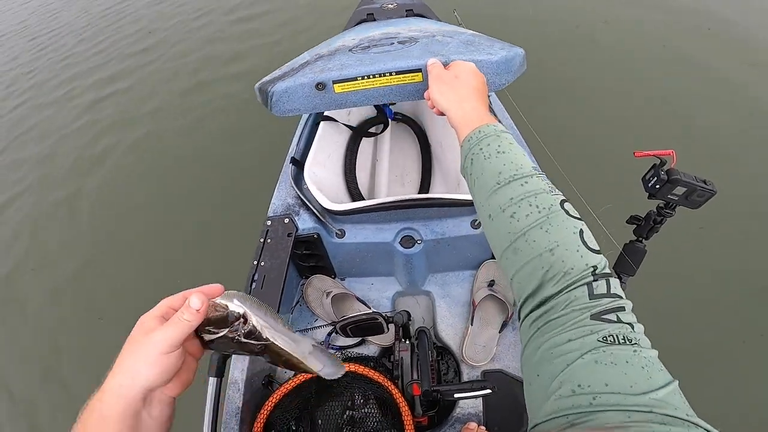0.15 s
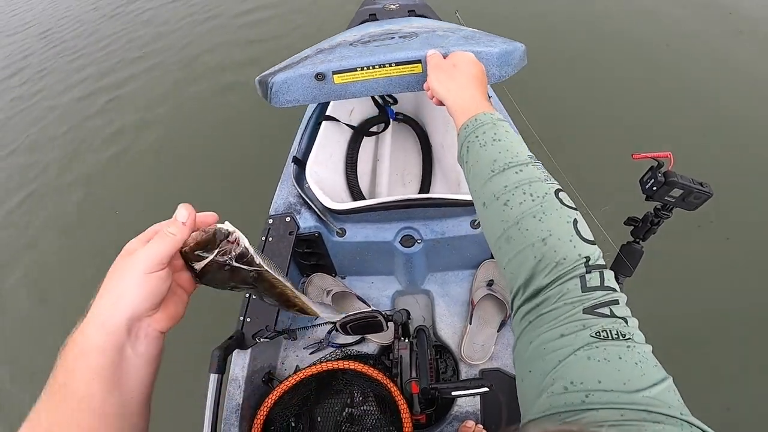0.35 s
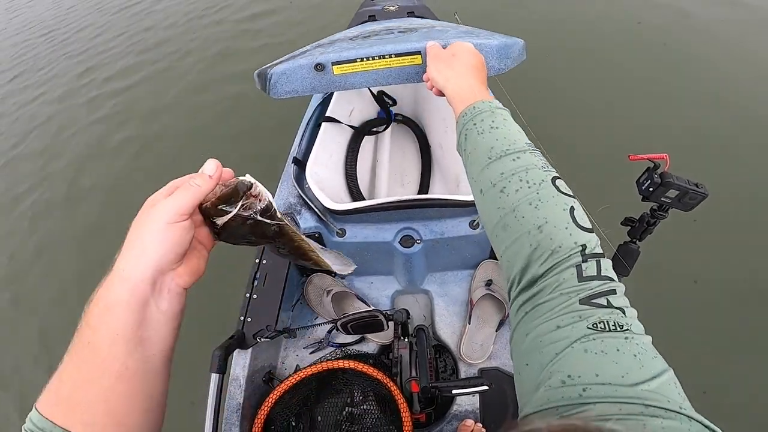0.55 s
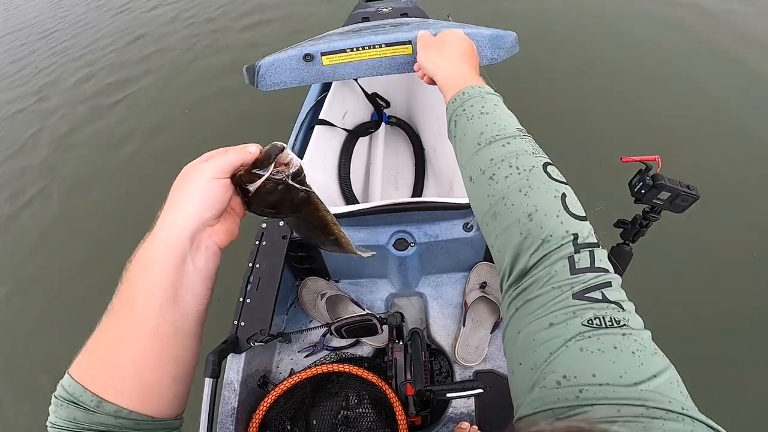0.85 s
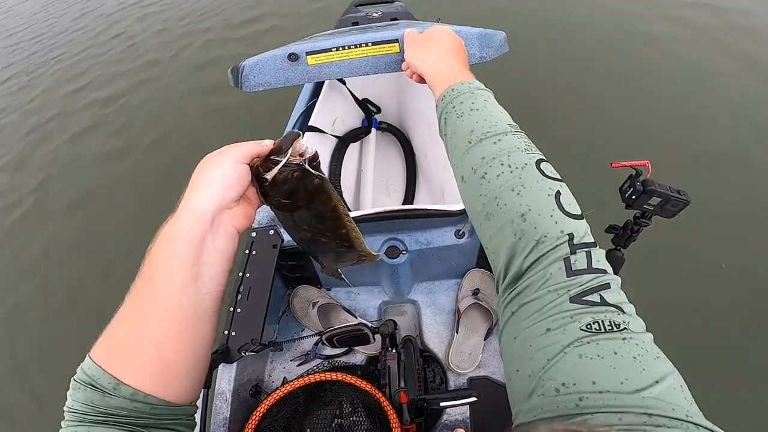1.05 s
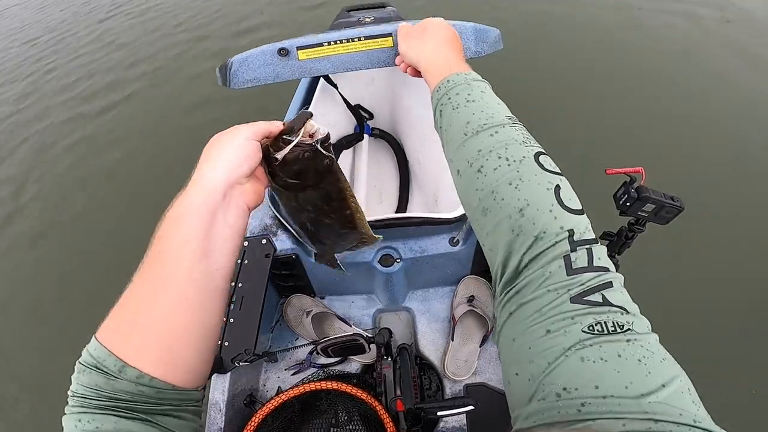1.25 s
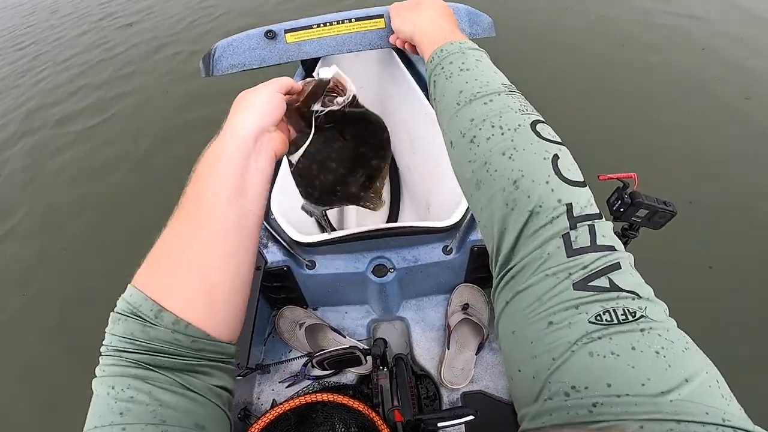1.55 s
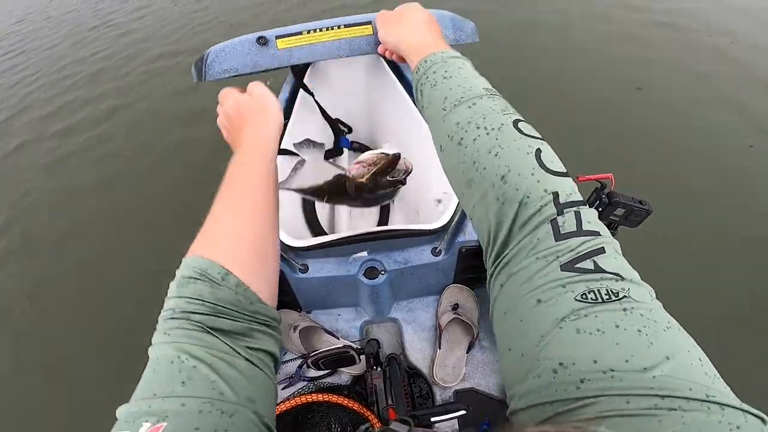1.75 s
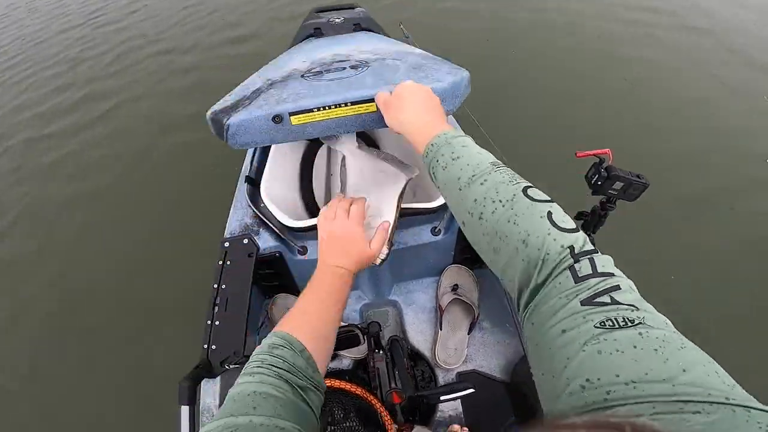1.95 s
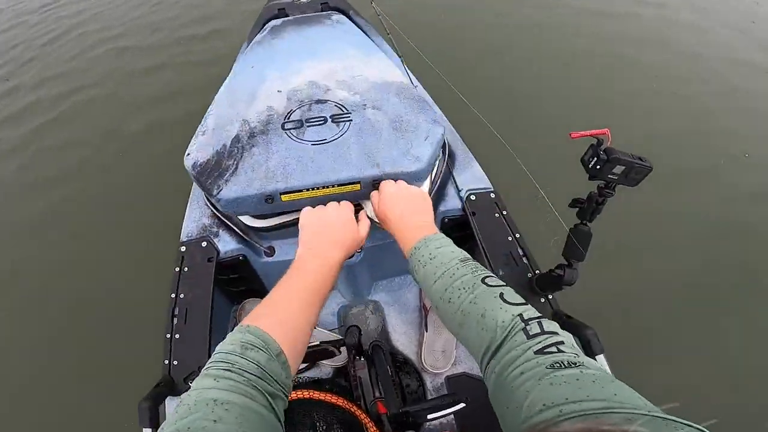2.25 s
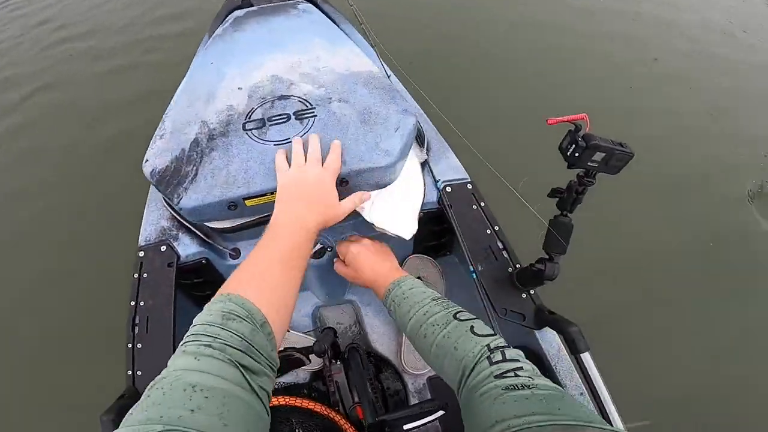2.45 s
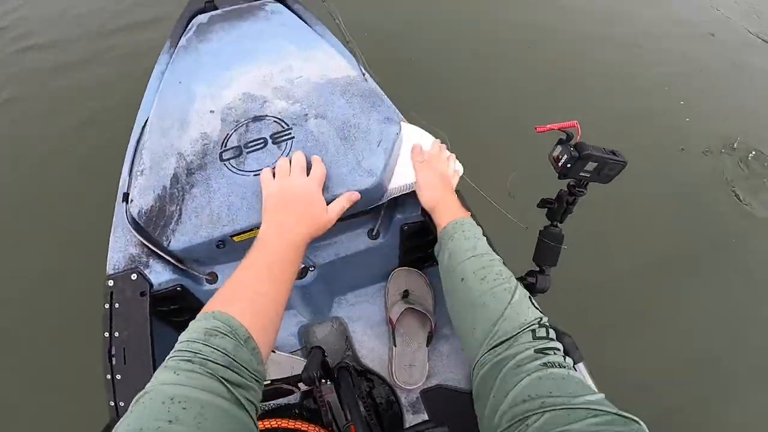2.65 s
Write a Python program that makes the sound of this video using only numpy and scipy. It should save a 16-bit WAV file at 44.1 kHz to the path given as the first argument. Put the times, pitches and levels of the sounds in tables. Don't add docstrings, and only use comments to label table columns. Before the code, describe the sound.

Close camera microphone on open water: steady low hull rumble with faint ripples and drops, then a fish thrashing in a hollow plastic hatch, smacking, scraping and thumping as the lid is forced shut with a bang.

```python
import sys
import numpy as np
from scipy import signal
from scipy.fft import rfft, irfft, next_fast_len
from scipy.io import wavfile
from scipy.ndimage import map_coordinates

SR = 44100
rng = np.random.default_rng(int(sys.argv[2]) if len(sys.argv) > 2 else 0)


def pcm_store(signal):
    levels = np.round(np.clip(np.atleast_2d(signal), -1, 1) * 32767)
    wavfile.write(sys.argv[1], SR, levels.astype(np.int16).T)


def gain_from_db(level_db):
    decades = np.asarray(level_db, float) / 20
    return 10 ** decades


N = 123479

# frequency in Hz, strength in dB per Hz.
RUMBLE_COLOUR = [(8.8, -56.5), (15, 2), (43, -5.5), (130, -3), (152, -8), (334, -20), (600, -39.5),
                 (780, -79.5), (1320, -120)]
# centre in Hz, width in Hz, boost over the rumble in dB.
HULL_PEAKS = [(46.4, 25, 1), (87, 42, 6.5), (132, 4.4, 7.5), (309, 19, 3.5)]
# frequency in Hz, strength in dB per Hz.
HISS_COLOUR = [(290, -30), (500, -7), (675, -3.5), (1470, -5), (6140, -23), (8640, -25), (12300, -48),
               (13000, -66.5)]
# frequency in Hz, likeness (1 is the same).
LIKENESS = [(30, 0.63), (80, 0.95), (200, 1), (1000, 0.92), (3000, 0.28), (8000, 1)]
# start in seconds, peak level in dB, centre in Hz.
DROPS = [(0.112, -51, 5260), (0.3644, -61, 3150), (0.432, -60, 2300), (0.54, -65, 6000),
         (0.716, -59.5, 4500), (0.7528, -62, 2610), (0.761, -59, 3000), (0.774, -60.5, 2400),
         (0.9695, -66, 2300), (1.0253, -53, 3030), (1.2133, -56.5, 2360), (1.3554, -57.5, 2290),
         (1.394, -54.5, 2270), (1.4703, -53, 2770)]
# start in seconds, peak level in dB, pitch the spot favours in Hz, contact time in ms.
TUB_KNOCKS = [(1.578, -39, 1210, 1.9), (1.658, -31, 1230, 1.7), (1.711, -22, 1170, 1.7),
              (1.7205, -8, 1220, 0.76), (1.7255, -4.5, 670, 0.13), (1.7313, -4.5, 704, .2),
              (1.736, -21, 920, 12), (1.747, -16, 1110, 1.7), (1.754, -24, 1200, 7.8),
              (1.779, -19.5, 1150, 2), (1.806, -20.5, 1120, 2.1), (1.815, -17, 1100, 2.6),
              (1.844, -24.5, 1230, 1.6), (1.907, -31.5, 900, 1.2), (1.950, -16.5, 785, 1),
              (1.956, -15, 790, 5), (2.012, -18.5, 770, 9), (2.003, -23.5, 394, 4.9),
              (2.028, -20, 500, 9.1), (2.072, -32, 423, 4), (2.112, -21.5, 497, 7), (2.088, -59, 1000, 4),
              (2.096, -17.5, 660, 3.7), (2.105, -20, 660, 3)]
LID_KNOCKS = [(2.219, -26, 500, 6), (2.2245, -16.5, 1520, 0.99), (2.228, -8, 626, 1.7),
              (2.232, -16, 460, 1), (2.238, -15, 617, 1.6), (2.271, -19.5, 960, 3.1),
              (2.275, -19, 340, 2.5), (2.288, -23, 1010, 4.6), (2.319, -17, 1500, 0.36),
              (2.343, -19, 1060, 2.8), (2.375, -34, 1350, 2.4), (2.406, -11, 1390, 8),
              (2.413, -14.5, 726, 4), (2.427, -12.5, 860, 4.5), (2.437, -16.5, 867, 4.7),
              (2.461, -12, 1370, 7.5), (2.466, -12.5, 340, 3.3), (2.478, -8.5, 630, 5.5),
              (2.495, -12, 780, 3.6), (2.519, -7.5, 635, .8), (2.527, -18.5, 628, 6.1),
              (2.545, -15, 700, 5.7), (2.560, -10.5, 560, 3.9), (2.576, -17.5, 830, 4.6),
              (2.581, -26, 345, 1.4), (2.646, -19, 496, 15), (2.655, -13.5, 363, 9.8)]
RIM_KNOCKS = [
    (2.7237, -3.5, 1450, 0.52),
    (2.7374, -18, 1300, 5.2),
    (2.7756, -9.5, 1520, 2),
    (2.7854, -15.5, 1540, 7.3),
]
# centre in Hz, width in Hz, level in dB.
TUB_MODES = [(397, 74, 13), (647, 70, -2.5), (790, 38, -4), (1099, 90, 7.5), (1300, 77, 6), (1570, 170, 5)]
LID_MODES = [(345, 30, -1), (500, 50, -8), (635, 14, 10), (856, 30, 1), (1049, 60, -4), (1300, 80, -6),
             (1534, 80, -5)]
RIM_MODES = [(540, 60, 12), (1040, 60, 20), (1490, 70, 33), (2100, 1140, 17)]
# time in seconds, level in dB.
SCRAPE_LEVEL = [(1.581, -68.5), (1.70, -51), (1.816, -46.5), (1.888, -56.5), (1.964, -41), (2.112, -45.5),
                (2.151, -55.5), (2.212, -45), (2.286, -39.5), (2.387, -42.5), (2.479, -35.5),
                (2.642, -36.5), (2.702, -43.5), (2.778, -33.5)]
# frequency in Hz, strength in dB per Hz.
RUB_COLOUR = [(100, -15), (200, 5.5), (700, -10), (1600, -14.5), (3500, -23.5), (15800, -51.5)]
# start in seconds, peak level in dB, centre in Hz, spray after the crack in dB.
TUB_SMACKS = [(1.6134, -39.5, 1990, 5.5), (1.6287, -34, 2070, -3), (1.6472, -31, 1480, -6),
              (1.6589, -29.5, 3320, -9.5), (1.709, -23.5, 1930, -19), (1.725, -11, 1770, -2.5),
              (1.7311, -24.5, 2100, -6), (1.746, -47.5, 2260, -17), (1.7514, -34, 1910, -8),
              (1.769, -30.5, 2400, 2), (1.8033, -23, 3050, -8), (1.8204, -31.5, 1960, -10),
              (1.8448, -28.5, 2320, -7), (1.95, -25, 2330, 7), (1.907, -40, 2030, -10),
              (1.9989, -6.5, 2330, -5), (2.0627, -39, 1890, 6), (2.0923, -21, 2840, 19),
              (2.1066, -18, 2940, -13)]
LID_SMACKS = [(2.2215, -23.5, 2050, -25), (2.2737, -17.5, 2520, -10), (2.279, -20, 3480, -11),
              (2.2886, -19, 4040, -6), (2.2973, -22.5, 4700, 13), (2.319, -21.5, 2530, -30),
              (2.346, -48, 3100, -21), (2.3527, -17.5, 2200, -14), (2.3757, -15, 2260, -11.5),
              (2.41, -25, 2500, -6), (2.4932, -48, 3300, -18), (2.5516, -18, 3060, -26),
              (2.591, -11, 3350, -31), (2.6364, -27.5, 1970, -31), (2.646, -17, 3080, -23),
              (2.6551, -20, 2880, -25), (2.6648, -19, 2730, -44), (2.7255, -4.5, 2900, -29),
              (2.7577, -27, 1870, -11), (2.7752, -14.5, 2100, -6.5), (2.7848, -19.5, 4350, -12.5)]
# frequency in Hz, strength in dB per Hz.
SKIN_COLOUR = [(530, -57), (900, 1.5), (4130, -4), (4690, -9), (9020, -18), (13900, -29), (15700, -58)]
# start in seconds, peak level in dB, pitch in Hz.
BOOMS = [(1.729, -9, 183), (1.7404, -11, 187.5), (1.75, -9, 186), (1.764, -15.5, 161), (1.783, -14.5, 158),
         (1.944, -14, 132.5), (2.026, -11.5, 79), (2.165, -14, 113), (2.227, -9, 92), (2.236, -8.5, 208),
         (2.27, -11.5, 157), (2.293, -10.5, 80.5), (2.401, -8, 87), (2.419, -7, 132.3), (2.461, -3, 144),
         (2.494, -3.5, 75.3), (2.518, -3, 107), (2.558, -9, 165.5), (2.594, -11, 183), (2.649, -5, 132),
         (2.726, -0.5, 141), (2.75, -21, 161)]
# start in seconds, peak level in dB.
HEAVES = [
    (1.74, -16.5),
    (1.992, -18),
    (2.227, -19),
    (2.411, -19.5),
    (2.486, -17),
    (2.553, -15.5),
    (2.726, -20.5),
]
# frequency in Hz, level in dB.
MIC_ROLLOFF = [(9000, 0), (13800, -5), (15800, -13)]

RUMBLE_DB, HISS_DB = -30.5, -59
RIPPLE_CLICK_DB, RIPPLE_SPREAD_DB = -5.5, 3.5
DROP_DB, DROP_SPRAY_DB, DROP_BROAD_DB = 8.5, -27, -8.5
KNOCK_DB, STRIKE_SCATTER_DB = -3, 2.2
SPOT_DB = 14.5
FIRST_TOUCH = 1.4
SCRAPE_DB, GRAINS_PER_S, GRAIN_DB, GRAIN_SPREAD_DB = 1, 500, -0.5, 7.6
GRAIN_HZ, GRAIN_CYCLES = 2440, 4.3
SMACK_DB, SMACK_BROAD_DB = -1, -1
SMACK_WIDTH = 0.18
CRACK_T60, SPRAY_T60 = 0.015, 0.088
SOFT_TILT = 0.031
BOOM_DB, BOOM_T60, BOOM_RISE_S = -5, 0.15, 0.0018
HEAVE_DB, HEAVE_HZ, HEAVE_T60, HEAVE_RISE_S = -2, 53.4, 0.54, 0.0062
ECHO_DB, ECHO_T60 = -14, 0.044
LAG_S, LAG_ENDS_HZ = 2 / 44100, 10900
SHADE_DB = -5
TOP_HZ = 15800


def unit(x):
    return x / np.sqrt(np.mean(x ** 2) + 1e-20)


def along(points, hz):
    f, v = np.transpose(points)
    return np.interp(np.log(hz + 1), np.log(f + 1), v)


def wobble(rate):
    knots = rng.standard_normal(int(N * rate / SR) + 4)
    return map_coordinates(knots, [np.arange(N) * rate / SR])


def filtered(x, response):
    n = x.shape[-1]
    m = next_fast_len(2 * n)
    return irfft(rfft(x, m) * response(np.fft.rfftfreq(m, 1 / SR)), m)[..., :n]


def panels(modes):
    def response(f):
        total = 0
        for k, (centre, width, db) in enumerate(modes):
            damping = 1j * f * width
            total = total + (-1) ** k * gain_from_db(db) * damping / (centre * centre - f * f + damping)
        return total
    return response


def rush(gain):
    def mid_and_side(f):
        turn = np.arccos(np.clip(along(LIKENESS, f), -1, 1)) / 2
        return gain(f) * np.array([np.cos(turn), np.sin(turn)])

    mid, side = filtered(rng.standard_normal((2, N)), mid_and_side)
    return unit(np.array([mid + side, mid - side]))


def add(track, s, sound, db):
    i = round(s * SR)
    scaled = gain_from_db(db) * sound / np.abs(sound).max()
    track[..., i:i + sound.shape[-1]] += scaled[..., :max(N - i, 0)]


def clicks(per_s, spread_db):
    count = int(per_s * N / SR)
    when = (rng.random(count) * N).astype(int)
    pitch, size = rng.standard_normal((2, count, 1))
    hz = np.clip(GRAIN_HZ * np.exp(0.65 * pitch), 300, 14000)
    k = np.arange(SR // 100)
    fade = np.exp(-k / SR * hz / GRAIN_CYCLES)
    rings = gain_from_db(spread_db * size) * np.sqrt(GRAIN_HZ / hz) * np.sin(2 * np.pi * hz * k / SR) * fade
    return unit(np.bincount((when[:, None] + k).ravel(), rings.ravel(), N)[:N])


def rumble():
    def hull(f):
        peaks = sum(db / (1 + ((f - c) / w) ** 2) for c, w, db in HULL_PEAKS)
        return gain_from_db(along(RUMBLE_COLOUR, f) + peaks)

    sway_db = wobble(5.0) + 0.91 * wobble(9.27)
    return gain_from_db(RUMBLE_DB + sway_db) * rush(hull)


def ripples():
    sway_db = 0.15 * wobble(1) + 1.75 * wobble(30.53)
    hiss = rush(lambda f: gain_from_db(along(HISS_COLOUR, f)))
    trickle = gain_from_db(RIPPLE_CLICK_DB) * clicks(60, RIPPLE_SPREAD_DB)
    return gain_from_db(HISS_DB + sway_db) * (hiss + trickle)


def drops():
    rows = [(*drop, DROP_SPRAY_DB) for drop in DROPS]
    return smacks(rows, DROP_DB, DROP_BROAD_DB, 10000)


def knocks(rows, modes):
    out, t = np.zeros(N), np.arange(SR // 5) / SR
    for s, db, hz, contact_ms in rows:
        push = rng.standard_normal(len(t)) * np.exp(-1000 * t / contact_ms)
        push[0] -= FIRST_TOUCH * np.sqrt(contact_ms * SR / 2000)
        struck = []
        for centre, width, mode_db in modes:
            far_db = SPOT_DB * abs(np.log2(centre / hz))
            struck.append((centre, width, mode_db - far_db + rng.normal(0, STRIKE_SCATTER_DB)))

        def response(f):
            thud = 0.14 * f / (f + 200) / (1 + 1j * f / hz)
            return (panels(struck)(f) + thud) / (1 + 1j * f / 3000) ** 2

        add(out, s - 0.0005, filtered(push, response), db + KNOCK_DB)
    return out


def scrape():
    s, db = np.transpose(SCRAPE_LEVEL)
    level_db = np.interp(np.arange(N) / SR, s, db, left=-120) + SCRAPE_DB + 3 * wobble(70)
    bed = rush(lambda f: gain_from_db(along(RUB_COLOUR, f)) * (1 + 0.5 * np.abs(panels(LID_MODES)(f))))
    bed = bed / np.std(filtered(bed[0], lambda f: f > 1000))
    return gain_from_db(level_db) * (bed + gain_from_db(GRAIN_DB) * clicks(GRAINS_PER_S, GRAIN_SPREAD_DB))


def smacks(rows, level_db, broad_db=SMACK_BROAD_DB, top_hz=30000):
    out, t = np.zeros((2, N)), np.arange(SR // 8) / SR
    for s, db, hz, spray_db in rows:
        def response(f):
            skin = gain_from_db(along(SKIN_COLOUR, f)) / (1 + (f / top_hz) ** 4)
            tilt = ((f + 1) / 3000) ** (-SOFT_TILT * (db + 20.0) * min(hz / 3000, 1) ** 2)
            broad = gain_from_db(broad_db) * f ** 4 / (f ** 4 + (0.5 * hz) ** 4) * tilt
            pitched = np.exp(-(np.log((f + 1) / hz) / SMACK_WIDTH) ** 2)
            width = np.array([f > 0, f * f / (f * f + 6000 ** 2)])
            return skin * (broad + pitched) * width

        mid, side = filtered(rng.standard_normal((2, len(t))) * [[1], [0.85]], response)
        flutter = gain_from_db(4.2 * np.repeat(rng.standard_normal(len(t) // 64 + 1), 64)[:len(t)])
        crack = gain_from_db(-60 * t / CRACK_T60)
        spray = flutter * gain_from_db(spray_db - 60 * t / SPRAY_T60)
        shape = (1 - np.exp(-t / 0.0012)) * (crack + spray)
        add(out, s - 0.001, shape * np.array([mid + side, mid - side]), db + level_db)
    return out


def low_ring(hz, t60, rise_s):
    t = np.arange(SR // 2) / SR
    return np.sin(2 * np.pi * hz * t) * gain_from_db(-60 * t / t60) * (1 - np.exp(-t / rise_s))


def booms():
    out = np.zeros(N)
    for s, db, hz in BOOMS:
        ring = low_ring(hz, BOOM_T60, BOOM_RISE_S)
        ring += 0.56 * low_ring(1.46 * hz, 0.65 * BOOM_T60, BOOM_RISE_S)
        ring += 0.44 * low_ring(0.78 * hz, BOOM_T60, BOOM_RISE_S)
        add(out, s, ring, db + BOOM_DB)
    return out


def heaves():
    out = np.zeros(N)
    ring = low_ring(HEAVE_HZ, HEAVE_T60, HEAVE_RISE_S)
    ring += 0.5 * low_ring(0.626 * HEAVE_HZ, HEAVE_T60, HEAVE_RISE_S)
    for s, db in HEAVES:
        add(out, s, ring, db + HEAVE_DB)
    return out


def cockpit_echo(sound):
    t = np.arange(SR // 5) / SR
    noise = rng.standard_normal((2, len(t))) * gain_from_db(-60 * t / ECHO_T60)

    def response(f):
        return f / (f + 500) / (1 + f / 3000) * np.array([f > 0, f / (f + 3000)])

    mid, side = filtered(noise, response)
    walls = np.array([mid + side, mid - side]) / np.linalg.norm(mid)
    return gain_from_db(ECHO_DB) * signal.fftconvolve(sound, walls, axes=1)[:, :N]


def scene():
    water = rumble() + ripples() + drops()
    knocking = knocks(TUB_KNOCKS, TUB_MODES) + knocks(LID_KNOCKS, LID_MODES) + knocks(RIM_KNOCKS, RIM_MODES)
    fish = knocking + smacks(TUB_SMACKS + LID_SMACKS, SMACK_DB)
    return water + fish + cockpit_echo(fish) + scrape() + booms() + heaves()


def band_limit(x):
    return signal.sosfilt(signal.butter(12, 15800, fs=SR, output="sos"), x)


def record(dry):
    def ports(f):
        lag = LAG_S / (1 + (f / LAG_ENDS_HZ) ** 2)
        left = gain_from_db(SHADE_DB * (f / 12000) ** 2) * np.exp(-2j * np.pi * f * lag)
        right = 1 / np.abs(left) ** 0.5
        return np.array([left, right]) * gain_from_db(along(MIC_ROLLOFF, f)) * (f < TOP_HZ)

    padded = np.pad(dry, [(0, 0), (SR, SR)], "reflect", reflect_type="odd")
    mix = filtered(padded, ports)[:, SR:-SR]
    return band_limit(mix)


dry = scene()
out = record(dry)
pcm_store(out)
```